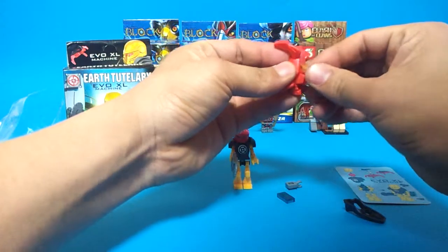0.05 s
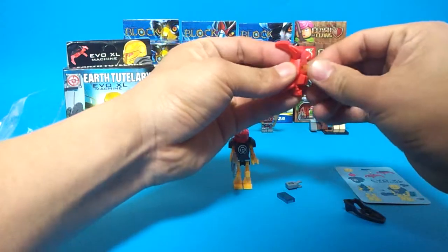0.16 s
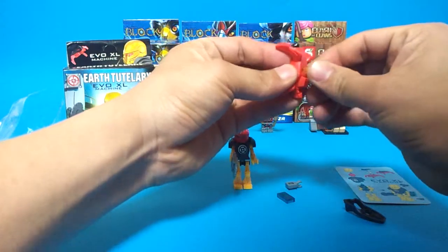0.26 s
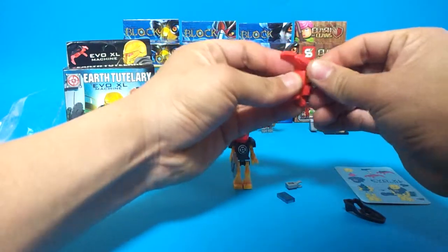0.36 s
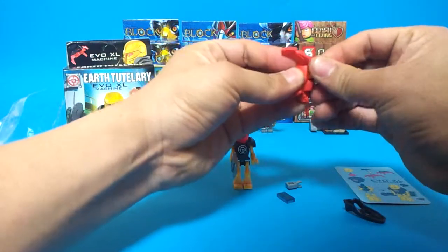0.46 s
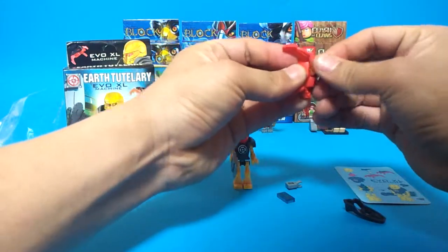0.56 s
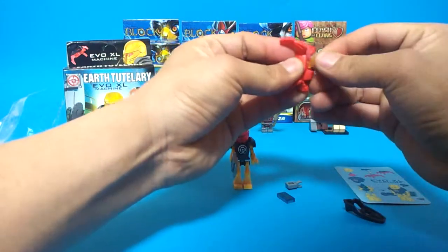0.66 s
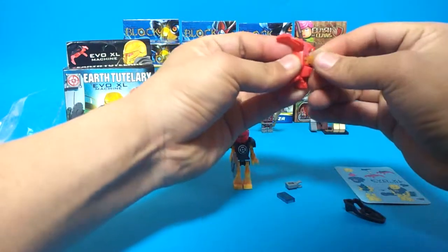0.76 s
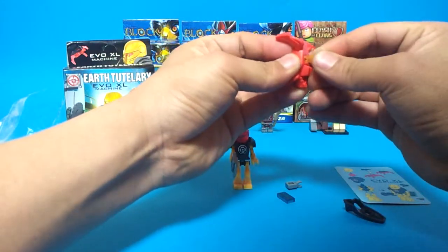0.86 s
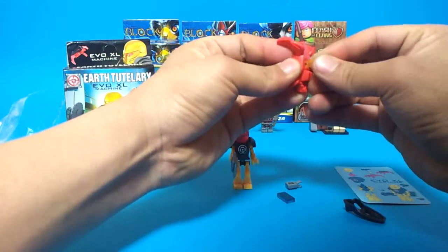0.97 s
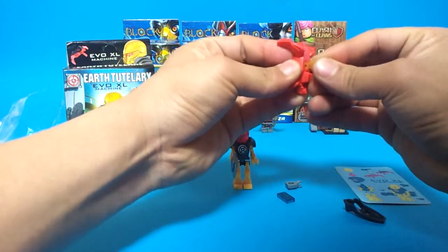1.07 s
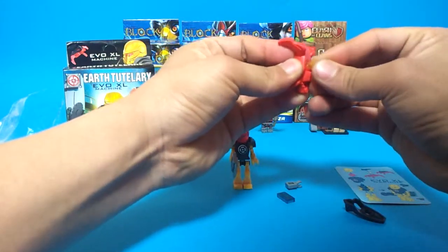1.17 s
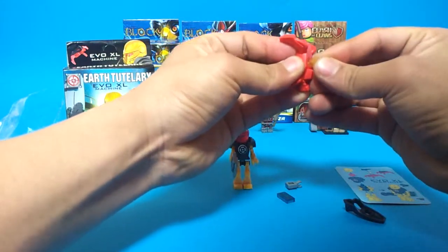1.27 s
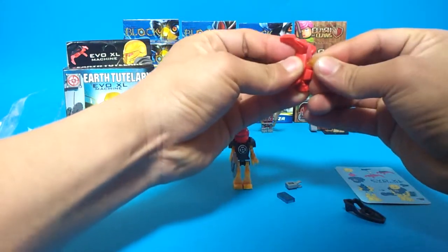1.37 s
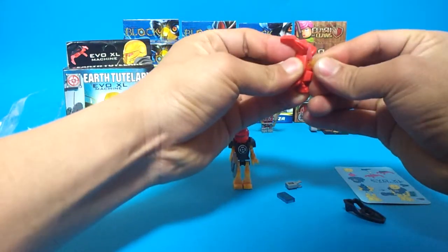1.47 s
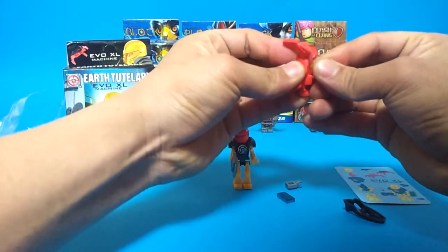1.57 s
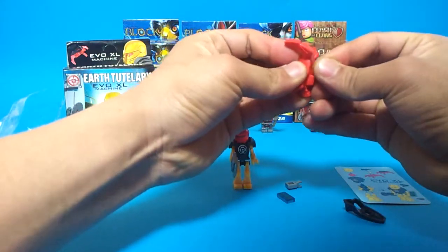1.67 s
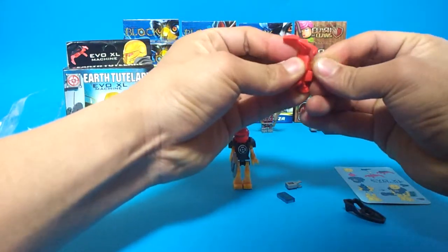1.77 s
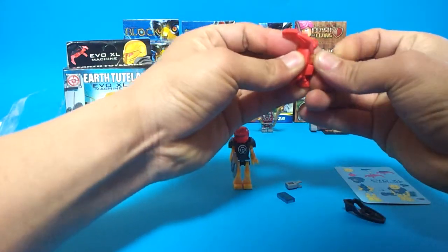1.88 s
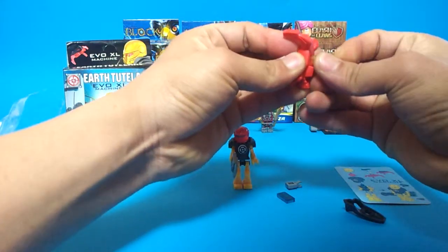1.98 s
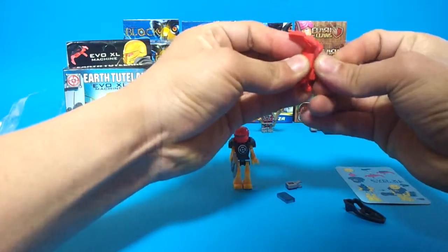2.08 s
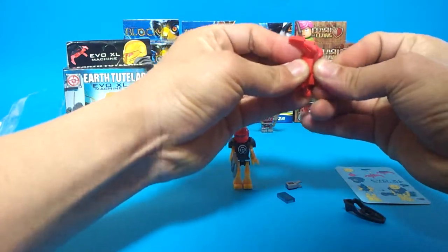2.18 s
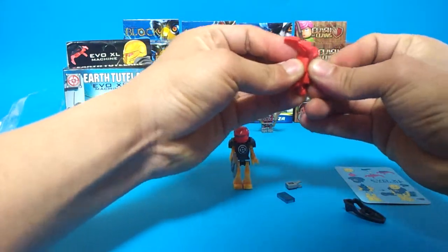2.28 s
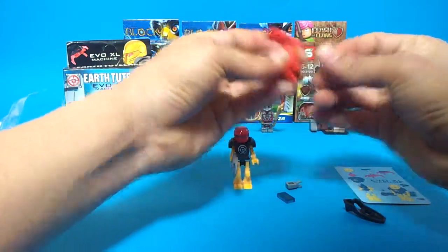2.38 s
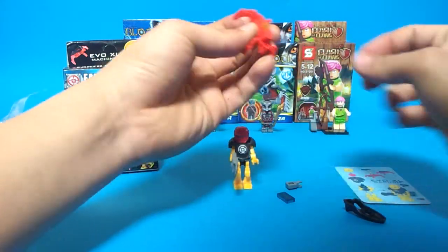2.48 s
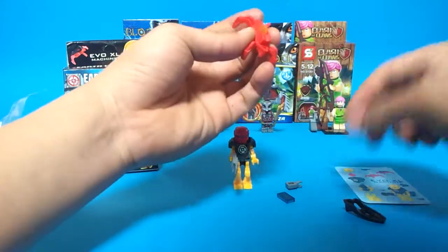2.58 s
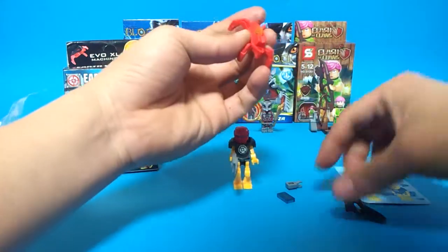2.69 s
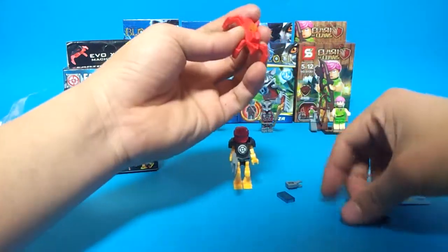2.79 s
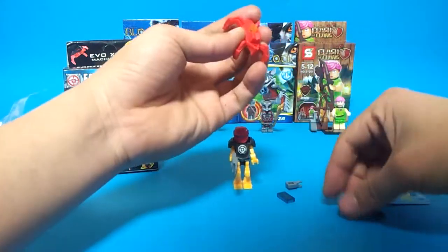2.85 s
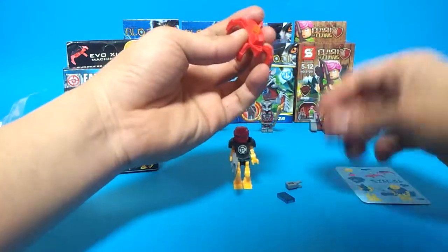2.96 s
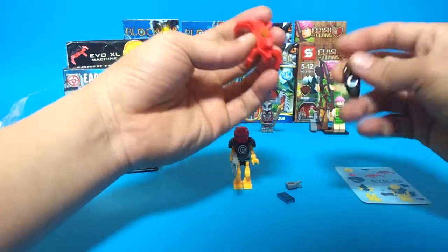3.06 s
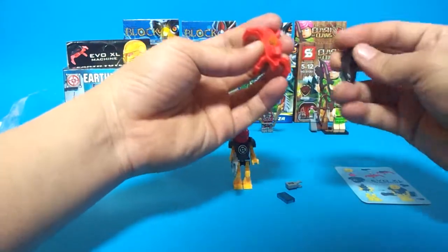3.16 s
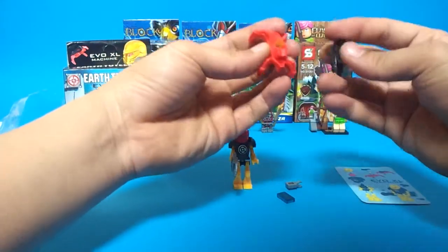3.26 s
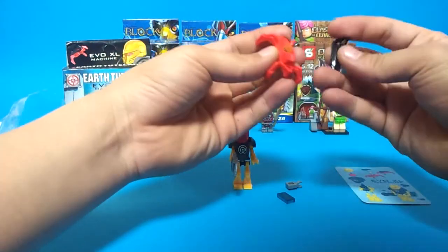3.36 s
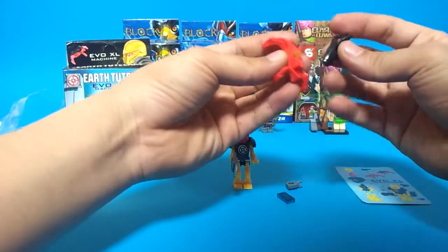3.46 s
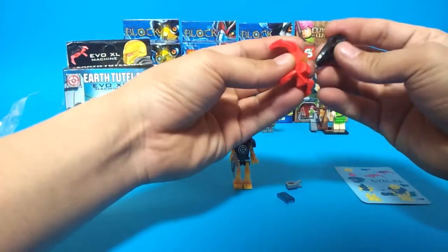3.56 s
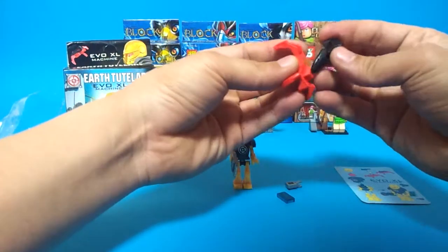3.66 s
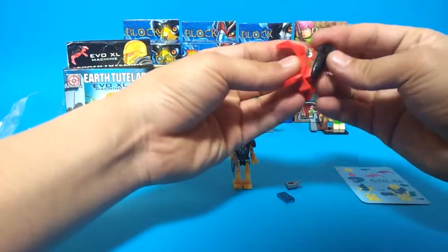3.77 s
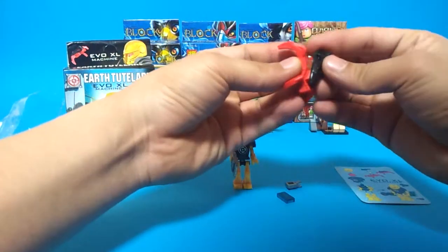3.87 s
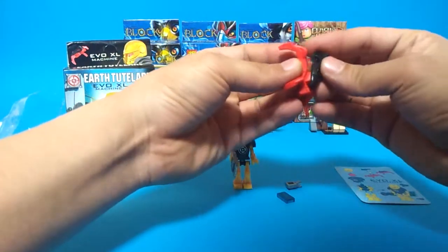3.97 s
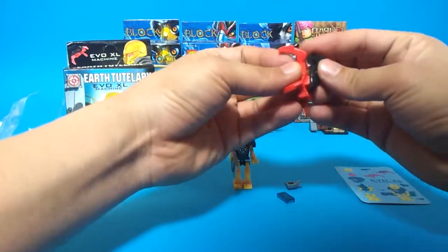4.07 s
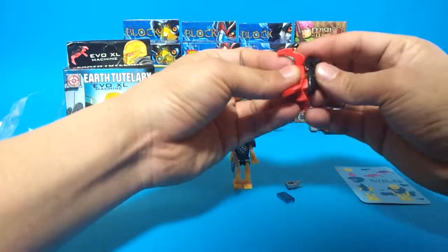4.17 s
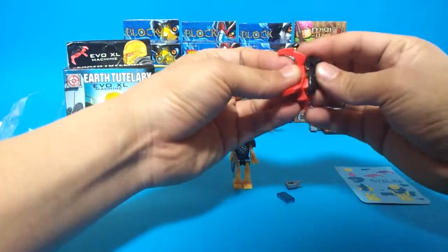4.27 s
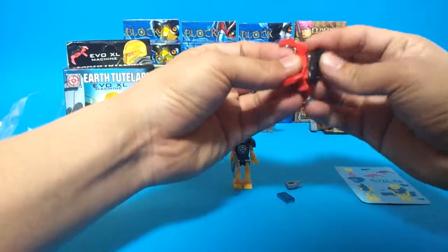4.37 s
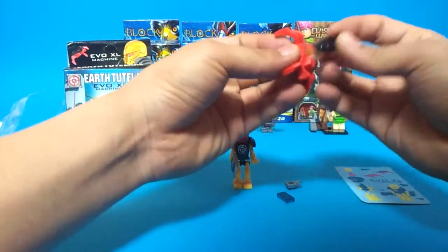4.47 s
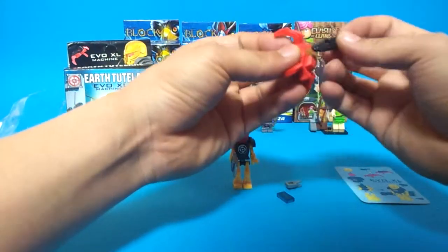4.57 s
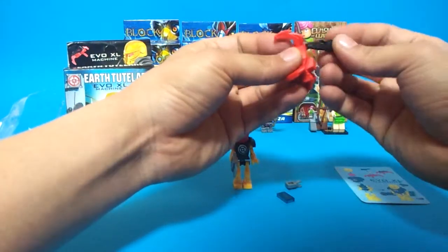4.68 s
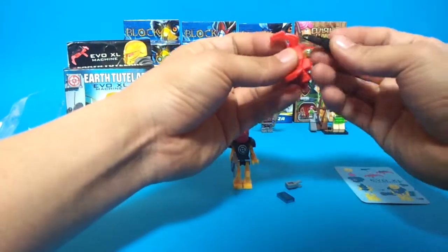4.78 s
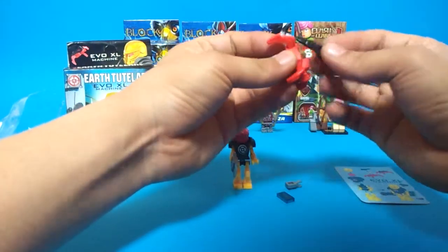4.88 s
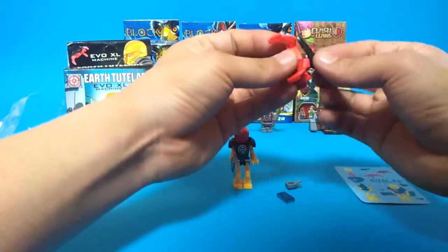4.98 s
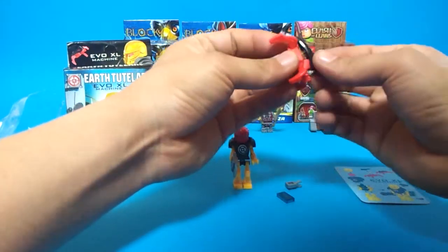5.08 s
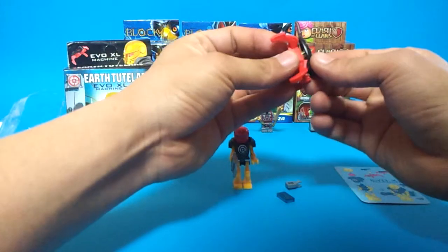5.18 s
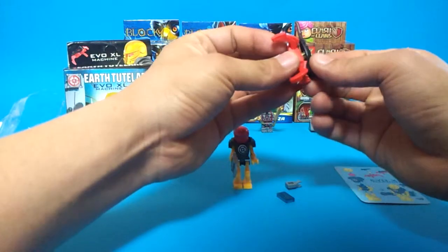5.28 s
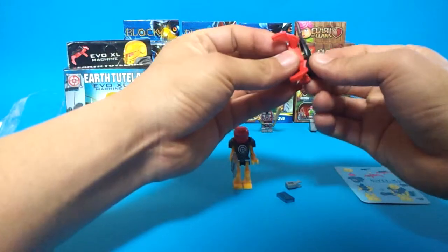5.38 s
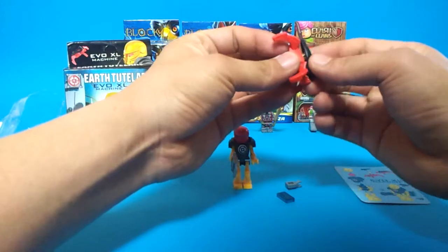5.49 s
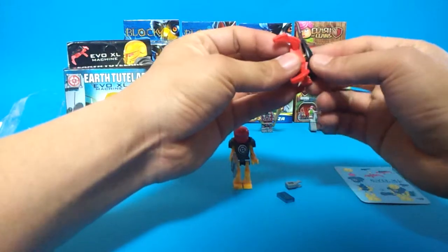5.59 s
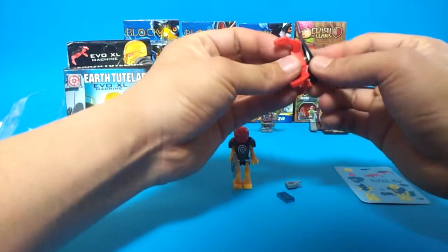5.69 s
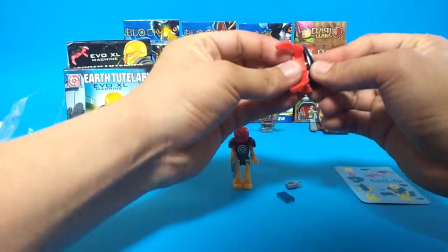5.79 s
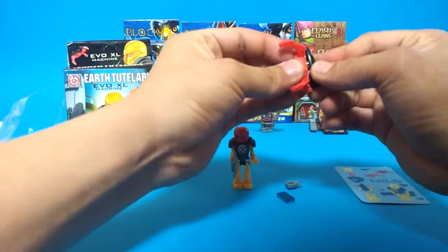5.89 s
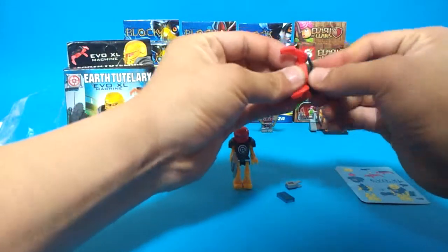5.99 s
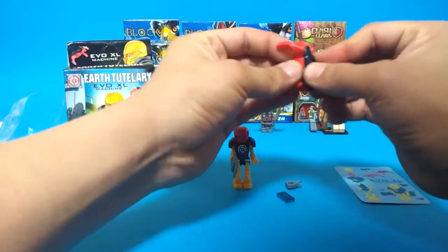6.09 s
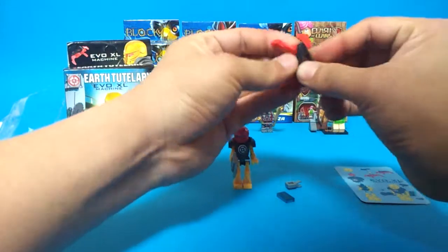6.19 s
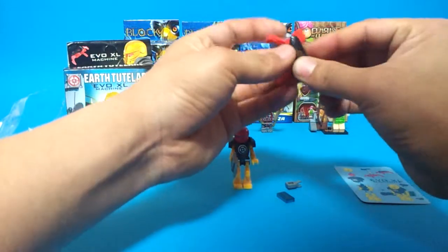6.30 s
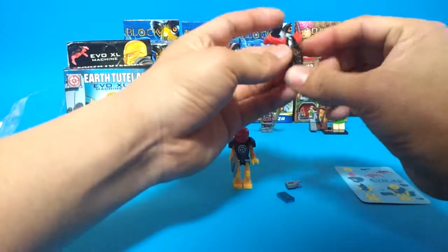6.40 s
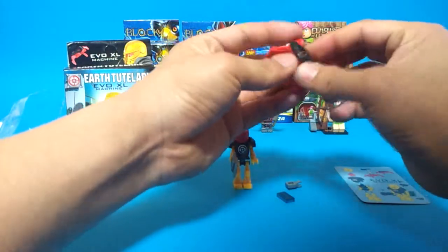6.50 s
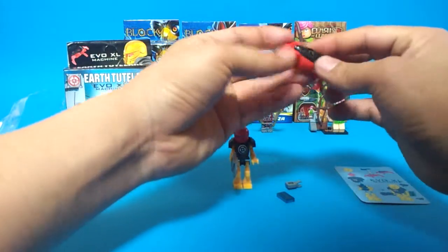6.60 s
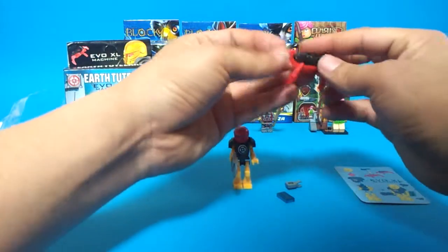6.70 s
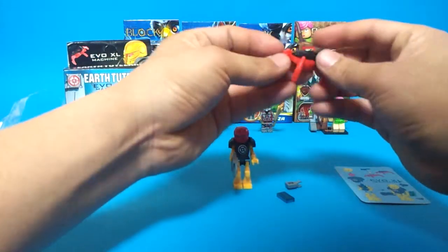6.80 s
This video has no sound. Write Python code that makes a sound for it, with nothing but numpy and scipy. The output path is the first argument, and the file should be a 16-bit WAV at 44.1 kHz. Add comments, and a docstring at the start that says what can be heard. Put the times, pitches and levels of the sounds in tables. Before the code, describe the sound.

Hands press plastic toy pieces together: two crisp snaps, light ticks, and a few dull knocks on a table in a quiet room.

```python
"""Plastic toy parts snapping together

Two hands press small parts together above a table, close to a mono microphone in a small room.
The joints tick as they slip and twice snap home, each click ringing the plastic for a few milliseconds.
In between, a hand bumps the table and picks up a part, and fingertips rub on the plastic.
The room answers the clicks and rubs briefly, over a low hum and hiss."""
import sys
import numpy as np
from scipy import signal
from scipy.fft import rfft, irfft
from scipy.io import wavfile

SR = 44100
rng = np.random.default_rng(int(sys.argv[2]) if len(sys.argv) > 2 else 0)


def transcribe(u):
    """Save the signal u as a 16-bit wav file named by the first command-line argument.

    u: samples, shape (n,) or (channels, n), limited to [-1, 1]; the rate is SR.
    q: integer samples, one column per channel.
    """
    v = np.clip(np.atleast_2d(u).T, -1, 1)
    q = np.round(v * 32767).astype(np.int16)
    wavfile.write(sys.argv[1], SR, q)


N = 302085


def undb(db):
    """Decibels to gain."""
    return 10 ** (np.asarray(db) / 20)


def colour(x, points):
    """Equalise a sound along a curve of (Hz, dB) points."""
    hz, db = np.transpose(points)
    bin_hz = np.maximum(np.fft.rfftfreq(len(x), 1 / SR), 1)
    curve_db = np.interp(np.log(bin_hz), np.log(hz), db)
    return irfft(rfft(x) * undb(curve_db), len(x))


def band(x, low_hz, high_hz):
    """Roll off the lows and the highs at 12 dB per octave."""
    for edge, kind in ((low_hz, "highpass"), (high_hz, "lowpass")):
        x = signal.sosfilt(signal.butter(2, edge, kind, fs=SR, output="sos"), x)
    return x


def add(track, start, sound):
    """Mix a sound into the track at a time in seconds."""
    i = int(start * SR)
    track[i:i + len(sound)] += sound[:len(track) - i]


def drift(turns_per_s):
    """Slow random drift with a spread near 1."""
    knots = rng.standard_normal(int(turns_per_s * N / SR) + 2)
    return np.interp(np.arange(N) / SR * turns_per_s, np.arange(len(knots)), knots)


def room_tone(rms_db=-57.5):
    """Still air and microphone hiss make a steady, bass-heavy bed."""
    # Each row: frequency in Hz, relative level in dB.
    air_curve = [(15, -56), (25, -36.5), (54, -11), (92, -8.5), (105, -8), (123, -2.5), (149, -5.5),
                 (189, -9), (221, -7.5), (253, -5.5), (387, -8.5), (859, -15.5), (1150, -16), (2700, -21.5),
                 (14400, -25.5)]
    air = colour(rng.standard_normal(N), air_curve)
    return undb(rms_db) * air / air.std()


def appliance_hum(waver_db=2.0, wander_hz=0.78):
    """A running appliance hums in a few low tones that waver slightly in pitch and level."""
    # Each row: frequency in Hz, rms level in dB.
    tones = [(120, -70), (213, -70), (229, -68), (397, -77)]
    out = np.zeros(N)
    for hz, db in tones:
        phase = 2 * np.pi * np.cumsum(hz + wander_hz * drift(4.06)) / SR
        out += np.sqrt(2) * undb(db - waver_db * drift(2.4)) * np.sin(phase)
    return out


def room(x, t60_s=0.15, predelay_s=0.0043, scatter_decay_s=0.0016, scatter_db=-17):
    """Add scatter off the hands, two early echoes and a short diffuse tail."""
    # Each row: frequency in Hz, tail level in dB against the direct sound.
    tail_curve = [(200, 3.5), (1000, -11.5), (2300, -8.5), (3800, -14.5), (5000, -9.5), (7000, -14),
                  (9500, -10), (14000, -13.5)]
    t = np.arange(SR // 3) / SR
    tail = rng.standard_normal(len(t)) * np.exp(-np.log(1000) * t / t60_s) * (t > predelay_s)
    response = colour(tail / np.linalg.norm(tail), tail_curve) * (t < t[-1] - predelay_s)
    scatter = rng.standard_normal(len(t)) * np.exp(-t / scatter_decay_s) * (t > .001)
    response += undb(scatter_db) * scatter / np.linalg.norm(scatter)
    response[int(0.0071 * SR)] += undb(-19)  # off the table
    response[int(0.011 * SR)] += undb(-22)  # off the boxes behind it
    return x + signal.fftconvolve(x, response)[:N]


def friction(size, centre_hz, slips_per_s=4000, spread_db=3):
    """Tiny uneven slips blur into a grainy band as wide as its centre frequency, at rms 1."""
    slips = (rng.random(size) < slips_per_s / SR) * rng.choice([-1, 1], size)
    slips = slips * undb(spread_db * rng.standard_normal(size))
    grain = band(slips, centre_hz / 2, centre_hz * 1.5)
    return grain / grain.std()


def fidget(level_db=-77, swing_db=4, moves_per_s=9, centre_hz=7000):
    """Fingertips keep shifting faintly on the plastic."""
    return undb(level_db + swing_db * drift(moves_per_s)) * friction(N, centre_hz)


def rubs(rise_to_decay=0.49):
    """Parts slide on fingers, table or each other; each slide swells quickly and dies away."""
    # Each row: peak time in seconds, rms level at the peak in dB, decay in seconds, centre in Hz.
    slides = [ (0.338, -58, .003, 7000), (2.36, -64, 0.079, 7000), (2.802, -44.5, .002, 5200),
              (2.813, -48.5, 0.025, 5160), (2.882, -58.5, .012, 7000), (3.76, -63.5, .04, 7500),
              (4.898, -61, 0.012, 8300), (4.969, -58, 0.0096, 5700), (5.185, -57, .005, 7500),
              (6.136, -54, .008, 4200), (6.281, -62, .016, 7000), (6.371, -61.5, .03, 6200),
              (6.722, -63, .01, 7300)]
    out = np.zeros(N)
    t = np.arange(-SR // 4, SR // 4) / SR
    for peak, db, decay, hz in slides:
        swell = np.exp(np.minimum(t / rise_to_decay, -t) / decay)
        add(out, peak + t[0], undb(db) * swell * friction(len(t), hz))
    return out


def knock(modes, start_s, push_db, push_s):
    """A soft push swells a body's modes, which then die away; a slow push hardly moves the high ones."""
    out = np.zeros(N)
    t = np.arange(SR // 4) / SR
    for hz, decay, mode_db in modes:
        gain = undb(push_db + mode_db) / np.hypot(1, hz * push_s)
        swell = np.minimum(t / push_s, 1) * np.exp(-np.maximum(t - push_s, 0) / decay)
        add(out, start_s, gain * swell * np.sin(2 * np.pi * hz * t))
    return out


def table_bumps():
    """The table thuds in its low modes as a hand bumps it, reaching for a part."""
    # Each row: frequency in Hz, decay in seconds, gain in dB.
    table_modes = [(66.4, .024, -1), (90, 0.015, 1.5), (129, 0.012, -8), (184, 0.01, -8)]
    # Each row: start in seconds, push strength in dB, push time in seconds.
    bumps = [(2.508, -44, .014), (2.557, -38, 0.018), (2.581, -33, .009), (2.687, -50, .008),
             (2.752, -36.5, 0.013)]
    return sum(knock(table_modes, *bump) for bump in bumps)


def part_lift():
    """The part knocks as it is lifted off the table."""
    # Each row: frequency in Hz, decay in seconds, gain in dB.
    part_modes = [(307, 0.019, -0.5), (413, 0.018, -2.5), (455, 0.025, -3), (3240, .025, 1)]
    return knock(part_modes, start_s=2.817, push_db=-33, push_s=0.0083)


def hand_jolt():
    """The last snap jolts the gripping hands into a dull thump."""
    # Each row: frequency in Hz, decay in seconds, gain in dB.
    grip_modes = [(92, .022, -16), (134, 0.031, -7.5), (210, 0.0029, 2), (439, 0.014, -5.5)]
    return knock(grip_modes, start_s=5.971, push_db=-33, push_s=.0022)


def plastic_ring(modes, looseness, detune=0.044, patchy_db=2, deadening=0.73, size=2048):
    """A kicked part rings in the fingers; a loose, fleshy grip shifts, reweights and deadens its modes."""
    t = np.arange(size) / SR
    out = np.zeros(size)
    chance = looseness * rng.standard_normal((len(modes), 2))
    for k, ((hz, width, db), (shift, weight)) in enumerate(zip(modes, chance)):
        damping = np.pi * width * (1 + deadening * looseness)
        wave = np.exp(-damping * t) * np.cos(2 * np.pi * hz * (1 + detune * shift) * t)
        gain = undb(db + patchy_db * weight) * 2 * damping / SR
        out += (-1) ** k * gain * wave  # neighbouring modes move the surface in opposite directions
    return out


def clicks(second_joint_s=5.0, loose_db=-30):
    """Slips kick the parts in hand, and near 2.8 s the part being picked up clicks against the table; a light
    contact lacks the lows, a soft one the highs."""
    # Each row: start in seconds, kick strength in dB, low cut in Hz, high cut in Hz.
    slips = [ (0.3380, -35.5, 5500, 8540), (1.5665, -23, 3000, 12700), (1.5682, -25, 3000, 11600),
             (2.0903, -0.44, 330, 12700), (2.802, -19.5, 3400, 5100), (4.0774, -34.5, 4500, 14500),
             (4.9584, -27.5, 4200, 7000), (4.9723, -32.5, 900, 6000), (5.0551, -43, 2000, 7500),
             (5.1868, -29, 6300, 14500), (5.9730, 3, 151, 3130), (5.9738, -1, 2680, 15000),
             (6.1315, -31.5, 1300, 6900), (6.1544, -37, 3500, 11000)]
    # Resonances of the parts held at each joint. Each row: frequency in Hz, width in Hz, gain in dB.
    first_joint = [(1160, 230, 0), (2290, 186, 7), (3160, 340, 7), (4010, 230, 11), (4790, 480, 8),
                   (5830, 390, 16), (6950, 330, 21.5), (7700, 330, 19.5), (8550, 480, 14.5),
                   (10800, 390, 12.5), (12700, 900, 6), (14800, 600, -12)]
    second_joint = [(430, 210, -2), (1210, 180, 7.5), (2375, 91, 16.5), (3560, 380, 8.5), (4790, 610, 14),
                    (4850, 230, 21.5), (6040, 590, 11.5), (6830, 180, 18), (7740, 290, 17.5),
                    (8880, 280, 16.5), (9700, 340, 15), (10340, 300, -3), (10600, 120, 8.5),
                    (12250, 370, 10), (13900, 600, 0)]
    out = np.zeros(N)
    for start, db, low_hz, high_hz in slips:
        looseness = np.clip(db / loose_db, 0, 1)  # loud snaps need a firm grip
        modes = first_joint if start < second_joint_s else second_joint
        ring = plastic_ring(modes, looseness)
        add(out, start, undb(db) * band(ring, low_hz, high_hz))
    return out


def scene():
    """Plastic in the room, dry thuds and the background; one microphone feeds both channels."""
    plastic = room(clicks() + rubs() + fidget())
    thuds = table_bumps() + part_lift() + hand_jolt()
    mono = plastic + thuds + room_tone() + appliance_hum()
    return np.array([mono, mono])


def record(dry, rumble_hz=41, top_hz=14750):
    """Drop the deepest rumble and cut the top steeply."""
    lean = signal.sosfilt(signal.butter(4, rumble_hz, "highpass", fs=SR, output="sos"), dry)
    return signal.sosfilt(signal.ellip(10, .1, 70, top_hz, fs=SR, output="sos"), lean)


dry = scene()
out = record(dry)
transcribe(out)
```